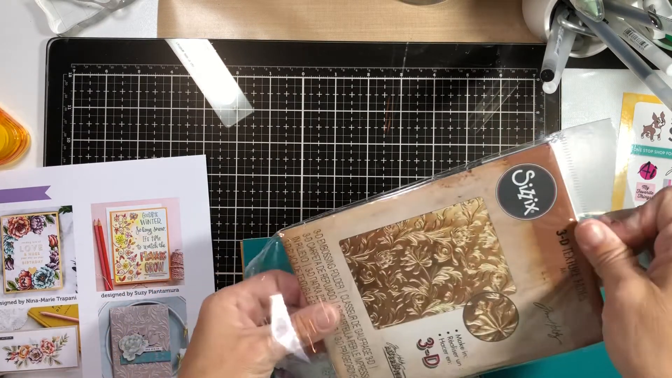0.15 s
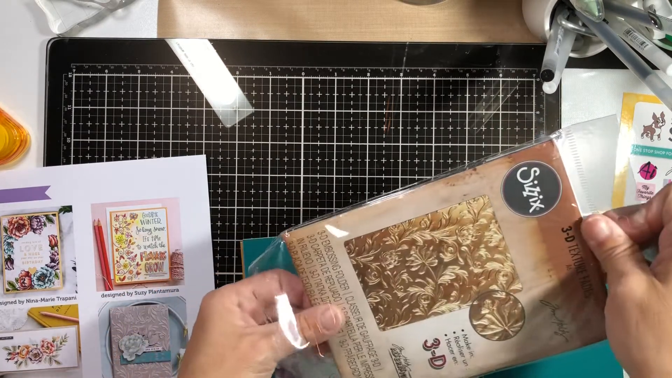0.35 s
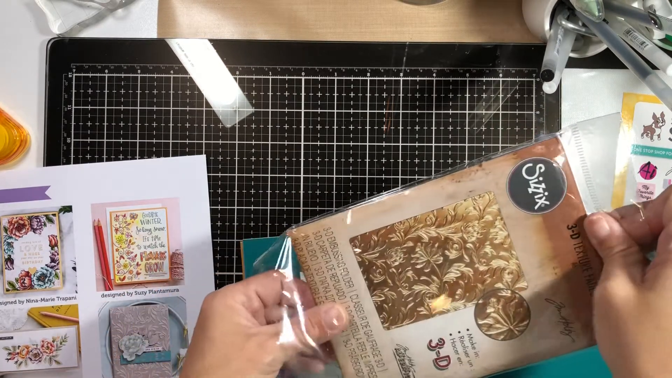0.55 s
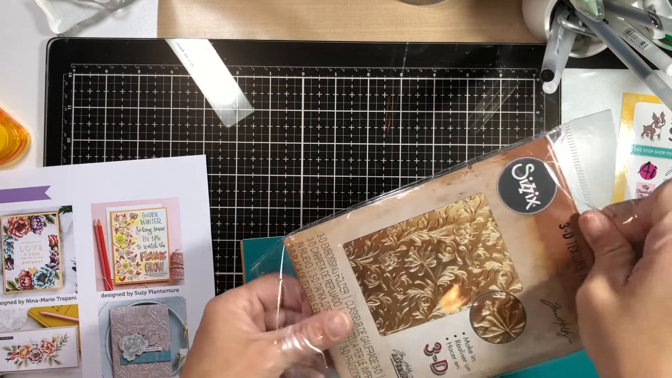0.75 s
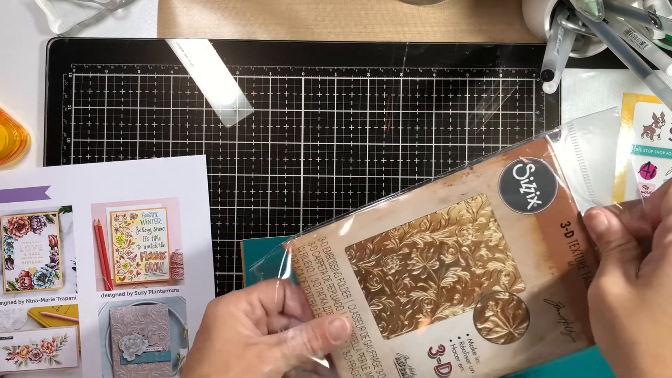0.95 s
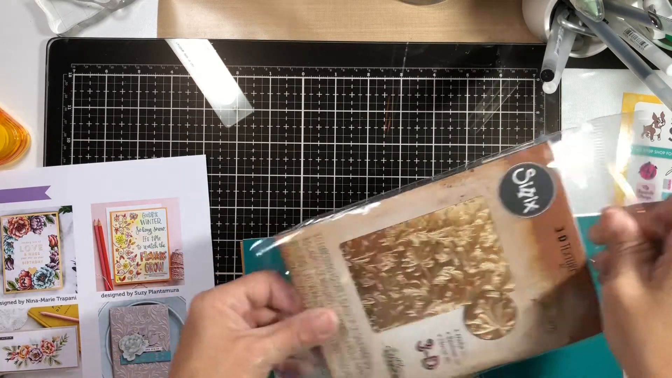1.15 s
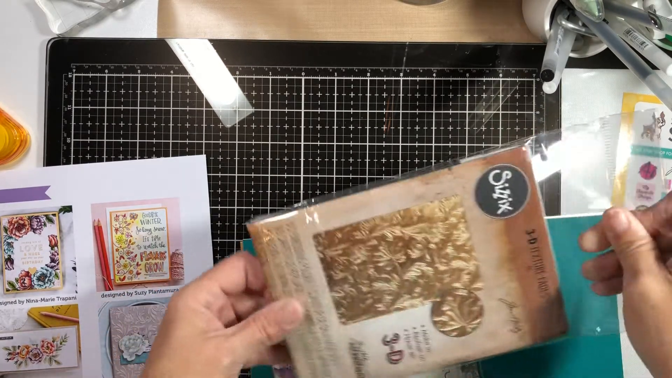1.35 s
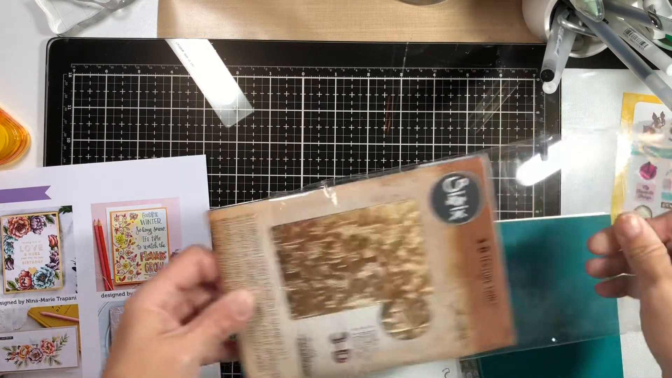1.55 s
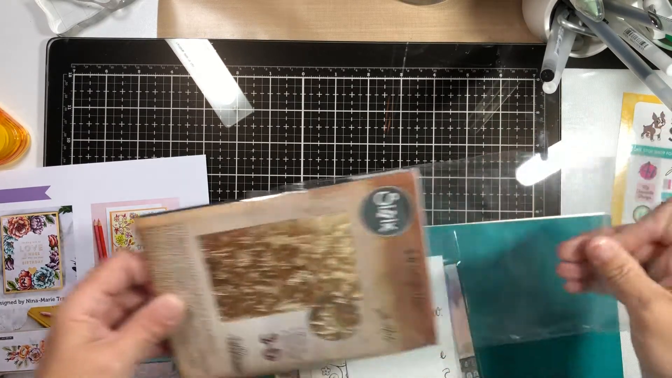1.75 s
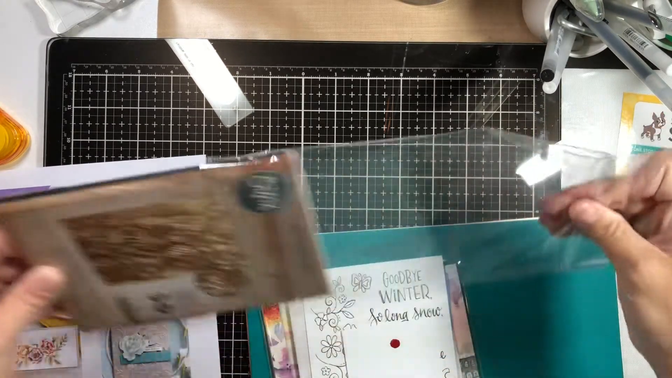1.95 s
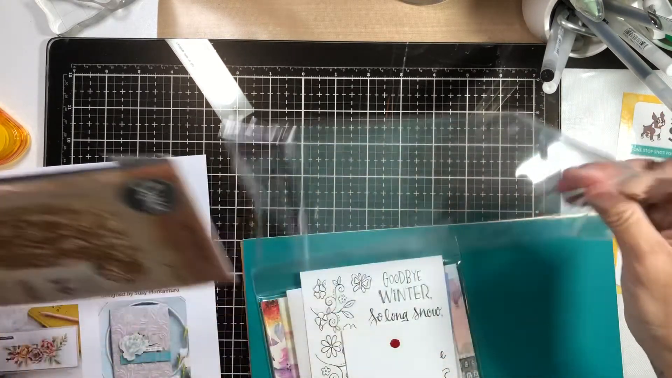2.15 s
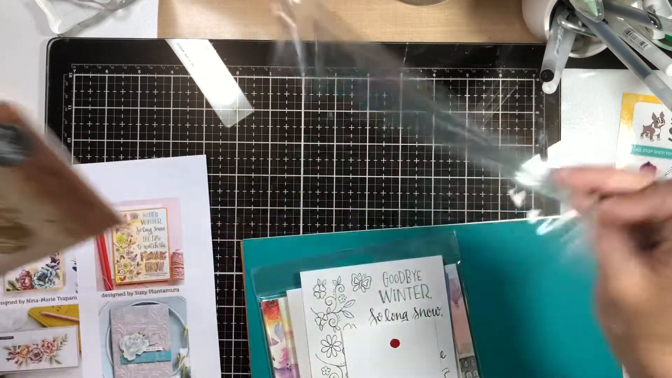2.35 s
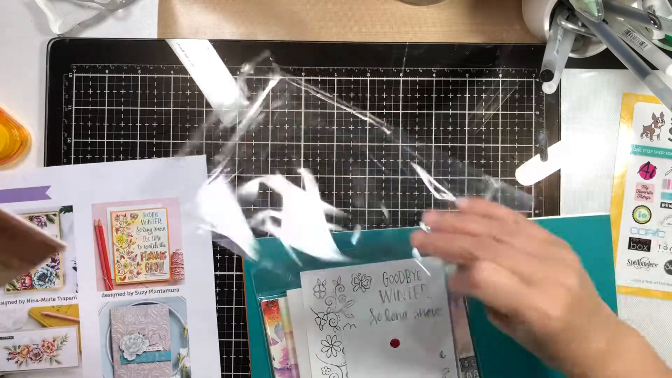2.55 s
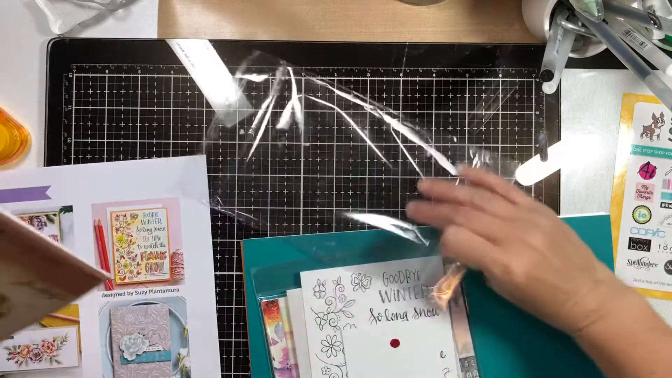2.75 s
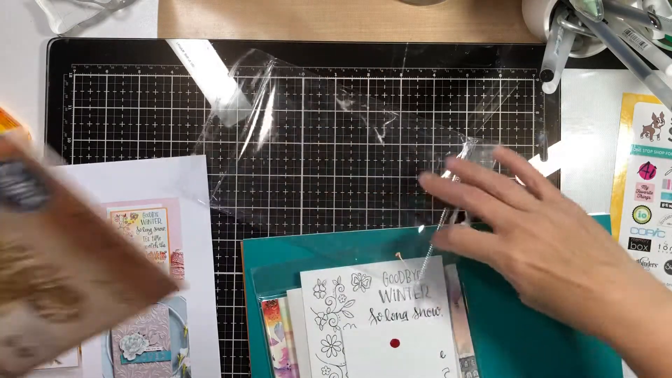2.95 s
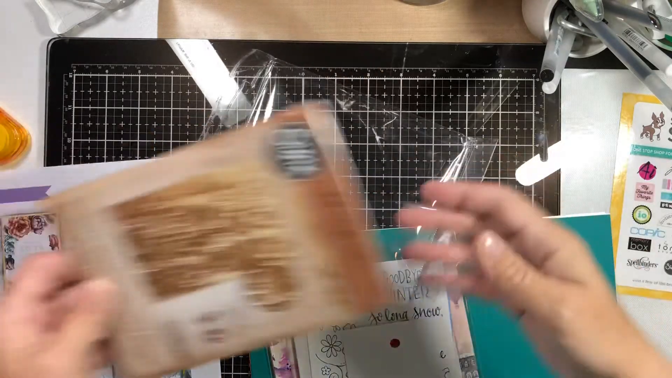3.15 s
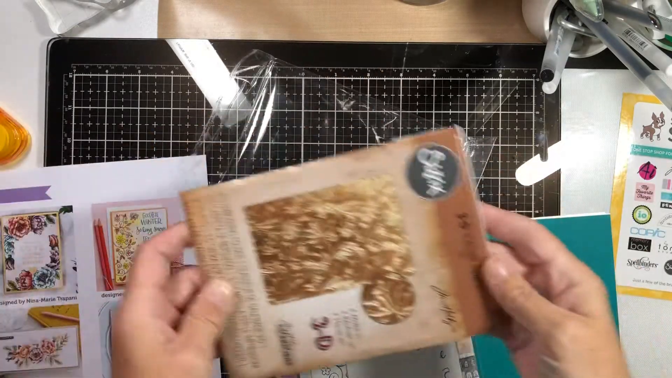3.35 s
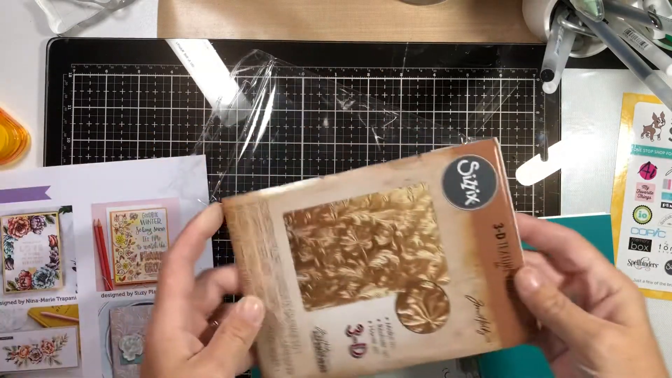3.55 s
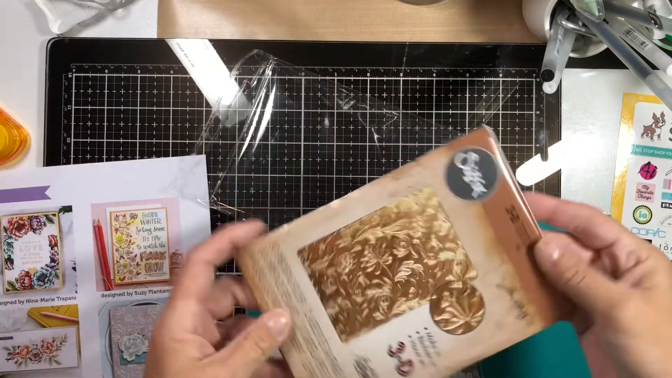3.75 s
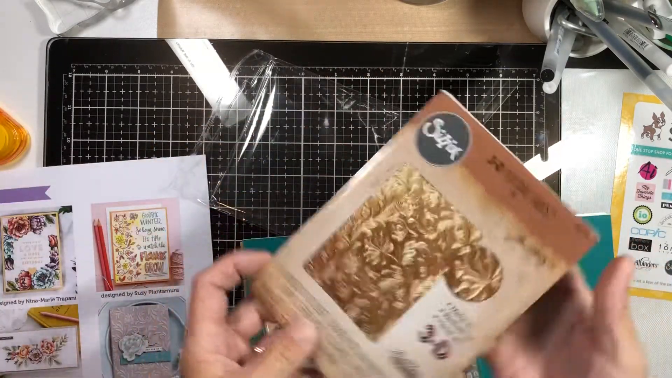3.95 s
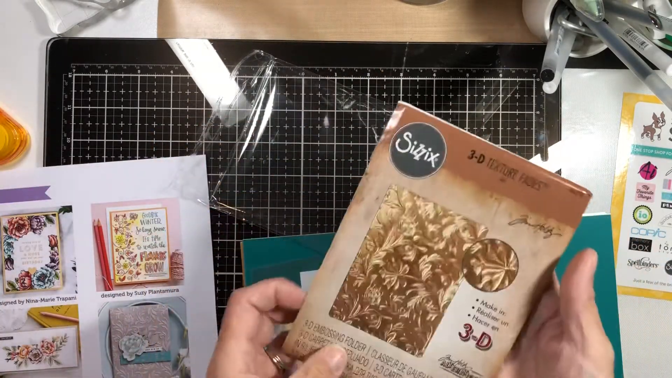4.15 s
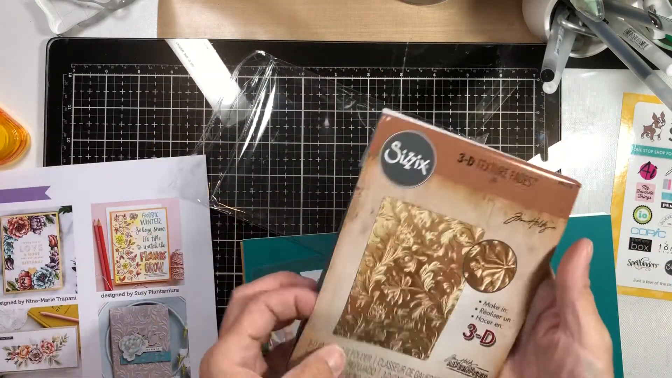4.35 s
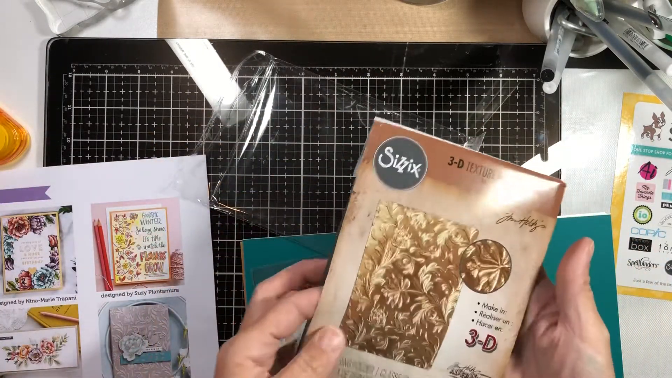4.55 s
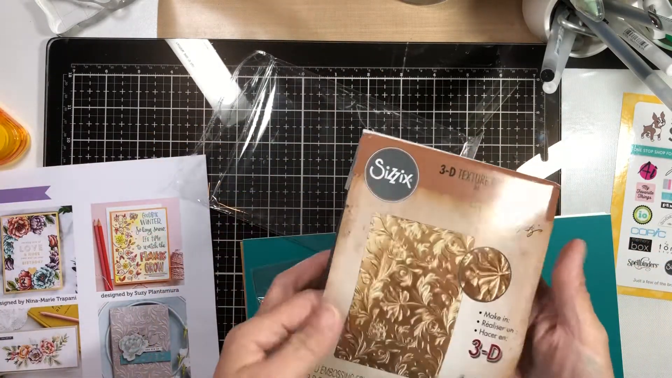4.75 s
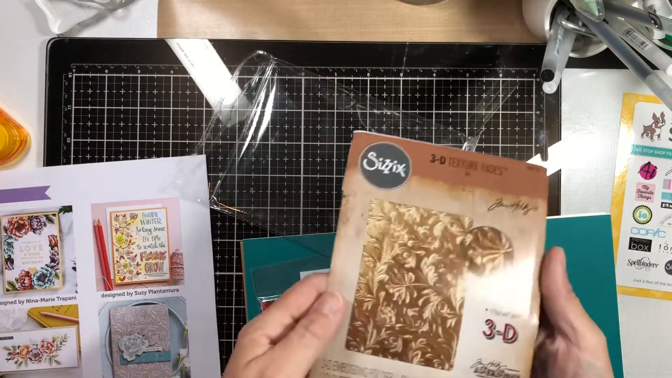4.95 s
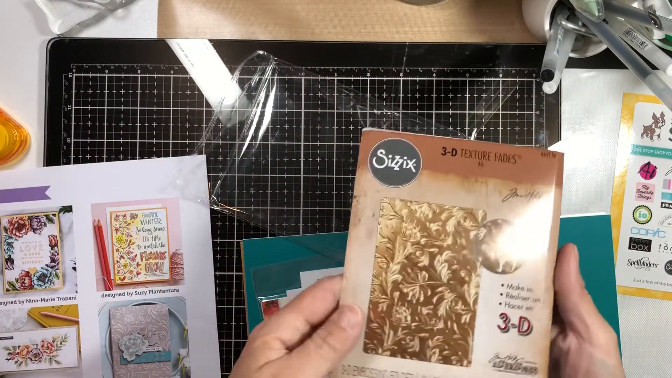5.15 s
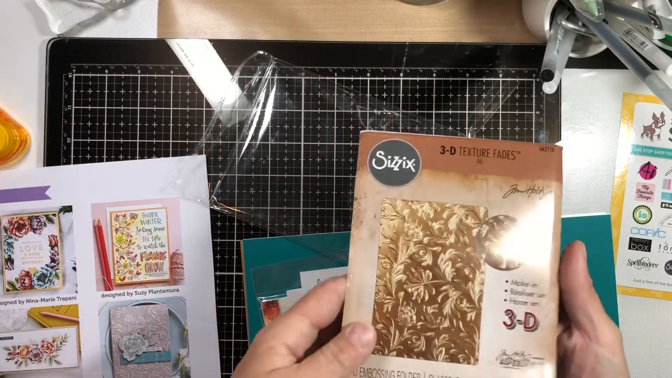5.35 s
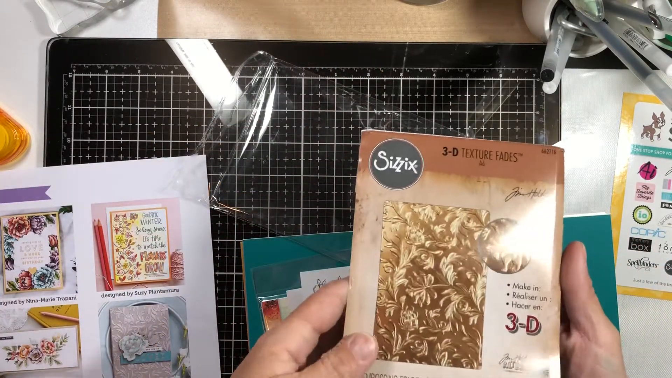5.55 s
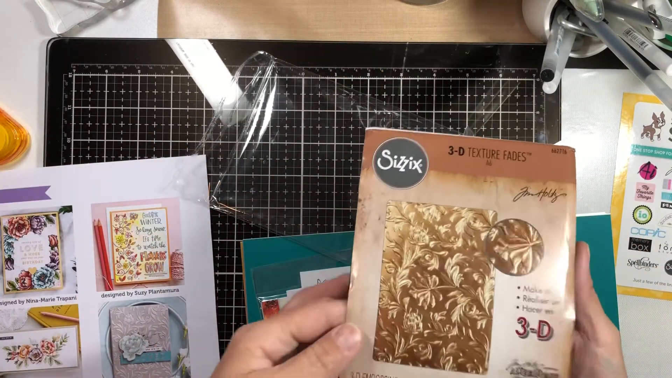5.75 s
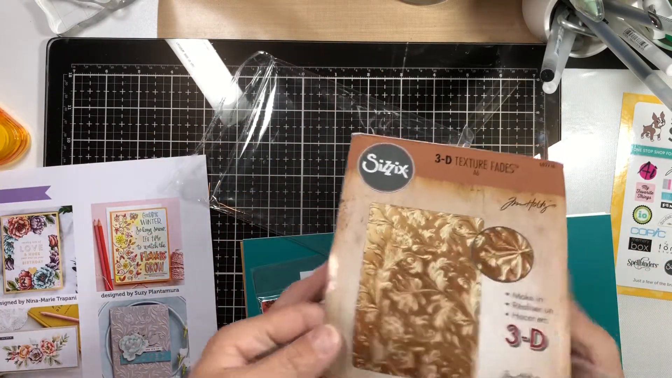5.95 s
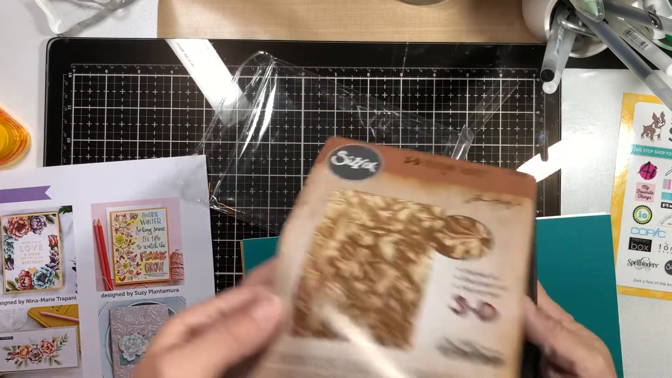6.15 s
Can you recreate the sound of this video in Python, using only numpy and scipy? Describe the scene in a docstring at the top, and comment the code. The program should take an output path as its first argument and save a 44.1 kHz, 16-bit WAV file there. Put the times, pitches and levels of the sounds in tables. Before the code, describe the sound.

Crisp plastic film crackles and swishes as a card pack slides from its sleeve, then soft finger rubs and taps over a fading low hum.

```python
"""Card pack out of a plastic sleeve

A card pack is worked out of a plastic sleeve above a craft table, close by. Creases of the film snap:
each is a dispersed click plus a ringing facet. Film hisses, then fingers rub the card: dense random slips
drive bands of sheet modes. Bumps ring the modes of the pack, and steady strokes make single resonances sing.
A small motor, a harmonic tone of sinking pitch, hums low in the room over a mains tone and shaped noise.
"""
import sys
import numpy as np
from scipy import signal
from scipy.fft import rfft, irfft
from scipy.io import wavfile
from scipy.ndimage import uniform_filter1d

SR = 44100
rng = np.random.default_rng(int(sys.argv[2]) if len(sys.argv) > 2 else 0)


def master_out(mix):
    """Clip the mix to full scale and print it as 16-bit PCM to the path in sys.argv[1]."""
    frames = np.transpose(np.atleast_2d(mix))
    ceiling = np.clip(frames, -1, 1)
    pcm = np.round(ceiling * 32767).astype(np.int16)
    wavfile.write(sys.argv[1], SR, pcm)


N = 272959
TIME_S = np.arange(N) / SR
MS_SAMPLES = SR // 1000
TOP_HZ = 16300  # upper limit of the treble
CARD_SHAKE_DB = -23  # shake of the card, relative to the tabled crack level
KNOCK_TICK_DB = -3  # tick of the contact, relative to the ring of the pack
MOTOR_START_HZ, MOTOR_SAG_HZ_PER_S = 82.4, .55
ROOM_AIR_DB, DRAUGHT_DB = -67, -73.5

# Clearest buckling creases, levels before the trims in snaps():
# (time [s], crack level [dB], crack centre [Hz], facet pitch [Hz], facet level [dB])
CREASE_SNAPS = [(.0474, -30, 4050, 6830, -22), (0.0763, -31, 14800, 3900, -32.5),
                (.091, -40, 4040, 13400, -51), (0.123, -34.5, 8200, 7250, -51),
                (0.1556, -35, 9800, 2670, -47), (.17, -35, 8100, 2200, -46), (.2167, -54, 3400, 10900, -22),
                (.2228, -32, 8700, 4330, -37), (.2392, -33, 4700, 14410, -19.5),
                (0.2531, -24, 6500, 2850, -28), (0.2565, -22.5, 12300, 2700, -43),
                (0.309, -21.5, 14800, 2120, -36), (.3183, -15, 10200, 7540, -25),
                (0.3936, -42.5, 2490, 2790, -48), (.4799, -54, 3100, 2270, -42),
                (0.5115, -25.5, 4430, 15060, -19), (0.6114, -36, 3400, 1960, -35),
                (.63, -37, 6000, 5800, -28.5), (.6396, -30, 11100, 2690, -42),
                (.6538, -27, 8800, 1570, -42), (0.666, -25, 4900, 13730, -31),
                (0.7219, -30, 3700, 7740, -28.5), (0.7485, -31.5, 3800, 11490, -30),
                (.762, -39, 11200, 2650, -24.5), (0.7744, -35, 3800, 14500, -19),
                (0.8114, -27, 3020, 930, -33.5), (.853, -31.5, 7700, 2800, -33.5),
                (0.897, -31, 5200, 1220, -43), (.9087, -23, 14900, 3140, -34),
                (.9442, -37, 7300, 2560, -58), (1.0998, -50, 794, 2740, -47),
                (1.1494, -52, 895, 2010, -36.5), (1.232, -29, 6300, 1850, -36),
                (1.2396, -27, 4100, 755, -28.5), (1.2711, -24.5, 6600, 2280, -30),
                (1.29, -23.5, 7300, 2230, -27), (1.302, -27, 2880, 12000, -27.5),
                (1.328, -35, 2900, 9190, -37), (1.3817, -36, 3800, 12300, -35),
                (1.419, -25.5, 8300, 6280, -26.5), (1.4226, -25, 3750, 1780, -28),
                (1.473, -30, 4100, 14520, -22.5), (1.481, -24, 7200, 2330, -30.5),
                (1.5787, -24.5, 6940, 930, -37.5), (1.7402, -41, 4700, 11100, -28.5),
                (1.7634, -34, 2700, 13000, -34), (1.8358, -31.5, 4300, 1310, -39),
                (1.8527, -32, 3220, 12760, -35), (2.0727, -22, 9800, 5950, -25.5),
                (2.108, -33, 4000, 2000, -52), (2.2067, -37, 8400, 4900, -34.5),
                (2.3204, -35.5, 8600, 5060, -39), (2.3712, -37, 3500, 8550, -39.5),
                (2.4907, -34, 5000, 1480, -48), (2.506, -35.5, 1790, 5060, -25),
                (2.706, -35.5, 5500, 1420, -43), (2.7367, -23, 4600, 5040, -48),
                (2.7672, -40, 4800, 5230, -38), (2.773, -44, 4200, 9100, -47),
                (2.7873, -34.5, 3900, 14150, -32), (2.8286, -35.5, 900, 2180, -37),
                (2.8389, -39, 1800, 5300, -45), (2.896, -26.5, 2700, 13720, -30.5),
                (2.9065, -30, 5100, 1490, -41), (2.9393, -30.5, 7950, 2550, -34.5),
                (3.049, -47.5, 4400, 4050, -49.5), (3.3056, -56, 14100, 4440, -40),
                (3.3208, -59, 1700, 5350, -34.5), (3.4462, -33, 4470, 1900, -44),
                (3.7533, -38.5, 4700, 3040, -46), (3.8056, -34.5, 5940, 2000, -46),
                (4.0306, -56, 3120, 4770, -27.5), (4.381, -37, 9000, 6700, -34),
                (4.466, -52, 5000, 5470, -27), (5.0853, -37.5, 2710, 4400, -41),
                (5.2104, -35.5, 2040, 3800, -31), (5.8467, -30.5, 3540, 1370, -37),
                (5.8935, -55, 2000, 1460, -39)]
# Pulls of the film over pack and table, levels before the trims in rub():
# (start [s], end [s], level [dB], swell start to end [dB], hiss over level [dB], body over level [dB],
#  spread of slip sizes [dB])
FILM_STROKES = [(0, .012, -53.5, -4.5, 13, -6, 5.5), (.05, .1, -60.5, 3, 0, -3.5, 7),
                (.11, .19, -73, 6, -2, 6, 8), (.2, .34, -54, -3.5, 2.5, -6, 6),
                (.35, .45, -68.5, 2, 7, 2, 8), (.53, .6, -60, 5, 3, -3.5, 8),
                (.605, .675, -52, 10, 6.5, -5.5, 5), (.68, .865, -59, 5, 4, -1, 7.5),
                (.885, 1.0, -56, -12, 6, -3.5, 5), (1.01, 1.18, -74.5, -2, -7, 6.5, 8),
                (1.197, 1.31, -50.5, -6, 7, -3, 3.5), (1.32, 1.46, -56, -0.5, 7, -2, 5),
                (1.495, 1.77, -49, -7, 9.5, -10.5, 0), (1.78, 1.88, -59, -1.5, 6, -1, -0.5),
                (1.91, 1.99, -48.5, 1.5, 14.5, -11, 0), (2.02, 2.105, -50.5, 2.5, 10, -10.5, 0.5),
                (2.12, 2.17, -63, -2, 6, -1, 1), (2.185, 2.21, -57, -5.5, 16, -5.5, 3),
                (2.23, 2.37, -65.5, 4, -3, -3, 10.5), (2.42, 2.49, -70.5, 2, 6, 2, 6),
                (2.51, 2.65, -65.5, 2, -6.5, -2.5, 6.5), (2.75, 2.81, -56.5, -3, -10, -2, 8.5),
                (2.835, 2.94, -51, 3.5, -5, -10, 5)]
# Fingers sliding over the card, levels before the trims in rub():
# (start [s], end [s], level [dB], swell start to end [dB], hiss over level [dB], body over level [dB],
#  spread of slip sizes [dB])
CARD_STROKES = [(3.315, 3.35, -68.5, -3, 6, 5, 5), (3.37, 3.55, -71, 2.5, 6.5, -10, 3.4),
                (3.655, 3.73, -69.5, -5.5, 7, -9, 3), (3.75, 3.87, -63, 6.5, 7.5, -15, 2.1),
                (3.93, 4.0, -59, 0.5, 7, -16, 4.3), (4.02, 4.3, -60.5, -6.5, 5.5, -8.5, 2.4),
                (4.37, 4.7, -52.5, -6, -5, -14, 2.5), (4.77, 5.06, -55, 2, -7.5, -9, 1.5),
                (5.085, 5.115, -48, 3, -5, -14, 3), (5.16, 5.54, -61.5, -12.5, -5.5, -9, 2.7),
                (5.66, 5.8, -58, -6, -4.5, -8.5, 2.3), (5.84, 5.92, -61, -8, -3.5, 1.5, 2.4),
                (5.95, 6.05, -65.5, 7, -1, -7, 3), (6.08, 6.19, -52, -3, -5, -6.5, 2.1)]
# Colour of the sliding film, relative: (frequency [Hz], density [dB per Hz])
FILM_COLOUR = [(120, -43), (200, -13.5), (519, -8.5), (659, -13.5), (986, -8.5), (1120, -16), (1770, -0.5),
               (2910, 1.5), (4270, 1), (4600, 5.5), (6760, -1.5), (7830, -3), (9930, -2), (14900, -5),
               (16000, -12.5)]
# Colour of the rubbed card, relative: (frequency [Hz], density [dB per Hz])
CARD_COLOUR = [(120, -46), (200, -28), (334, -27.5), (432, -15.5), (569, -13.5), (933, -42), (1300, -11),
               (2130, -2.5), (2910, -8), (5730, -10), (6760, -15), (7540, -13), (9060, -21.5),
               (11900, -18.5), (16000, -23)]
# Strokes that set a patch of sheet singing, level before the fades:
# (start [s], end [s], centre [Hz], width [Hz], level [dB])
SINGING_STROKES = [(1.454, 1.762, 7960, 900, -49.5), (1.873, 1.987, 4080, 900, -48),
                   (3.492, 3.55, 5640, 1000, -66), (3.632, 3.88, 3180, 398, -69),
                   (3.979, 4.215, 5000, 2000, -58), (4.299, 4.405, 3120, 450, -53),
                   (3.928, 4.18, 2150, 500, -68), (4.399, 4.776, 2260, 600, -54.5),
                   (4.496, 4.75, 7140, 500, -67.5), (4.515, 4.756, 12000, 600, -67),
                   (6.064, 6.19, 1290, 500, -57.5)]
# Bumps of the pack against fingers and sleeve: (time [s], level [dB], pitch of contact tick [Hz])
PACK_KNOCKS = [(.2545, -36.5, 2800), (.6663, -41.5, 1600), (.701, -35.5, 2700), (.7217, -41, 1690),
               (.853, -35, 2500), (.9442, -46.5, 2560), (1.1494, -42, 1400), (1.2711, -37.5, 1000),
               (1.3021, -33, 1920), (1.3822, -42, 900), (1.4226, -36.5, 1770), (1.481, -36, 1000),
               (1.5786, -46, 1000), (1.7634, -40.5, 990), (1.8527, -37, 2320), (1.985, -41.5, 604),
               (2.9063, -42.5, 1000), (3.3203, -52, 900), (3.97, -47, 4400), (4.414, -37.5, 1750),
               (4.7575, -44.5, 2080), (4.7987, -38.5, 2070), (5.2104, -39, 1410), (5.2234, -42.5, 1970),
               (5.382, -45, 2120), (5.9229, -34, 1350), (6.107, -41.5, 328)]
# Modes of the card pack: (frequency [Hz], width [Hz], gain [dB])
CARD_MODES = [(286, 140, -4.5), (422, 38, 4), (520.5, 44, 3), (686, 103, -2), (993, 86, -5),
              (1584, 120, -3.5)]
# Motor fundamental, rms before the waver: (time [s], level [dB])
MOTOR_LEVEL = [(0, -47), (.4, -43), (.7, -46.5), (1.2, -49), (1.7, -53.5), (2.2, -55), (2.7, -58.5),
               (3.4, -55), (6.19, -62)]
# Colour of the still room, relative: (frequency [Hz], density [dB per Hz])
ROOM_COLOUR = [(25, -31), (45, -14), (76, -18), (130, -13), (162, -11), (322, -14.5), (974, -20),
               (1460, -23), (2140, -23), (2560, -27.5), (4880, -29), (16000, -35.5)]


def amp(db):
    """Decibels to gain."""
    return 10 ** (np.asarray(db) / 20)


def unit(x):
    """Scale to rms 1."""
    return x / np.sqrt(np.mean(x ** 2))


def unit_energy(x):
    """Scale a response so that it passes white noise unchanged in level."""
    return x / np.sqrt(np.sum(x ** 2))


def resonate(x, hz, q):
    """One damped resonance with gain 1 at its centre, applied in the frequency domain."""
    ratio = np.fft.rfftfreq(len(x), 1 / SR) / hz
    response = 1j * ratio / (1j * ratio + max(q, .1) * (1 - ratio ** 2))
    return irfft(rfft(x) * response, len(x))


def cut(x, hz, kind, order=2):
    """Low-, high- or band-pass."""
    return signal.sosfilt(signal.butter(order, hz, kind, fs=SR, output="sos"), x)


def colour(x, points):
    """Shape a sound with a spectrum interpolated over log frequency."""
    hz, db = np.transpose(points)
    f = np.maximum(np.fft.rfftfreq(len(x), 1 / SR), 1)
    return irfft(rfft(x) * amp(np.interp(np.log(f), np.log(hz), db)), len(x))


def walk(rate_hz):
    """Random drift of rms 1, with rate_hz knots a second joined by straight lines."""
    knots = rng.standard_normal(int(N / SR * rate_hz) + 2)
    return unit(np.interp(TIME_S * rate_hz, np.arange(len(knots)), knots))


def tail(t60_s, size):
    """A dense decaying ring of energy 1."""
    decay = np.exp(-np.log(1000) * TIME_S[:size] / t60_s)
    return unit_energy(rng.standard_normal(size) * decay)


def snaps(creases, ring_t60_s=.028, ring_db=-3.5, facet_q=4.8, knock_t60_s=.04, knock_ring_db=-6,
          crack_trim_db=-1.0, facet_trim_db=-1.0, size=4096):
    """Each crease flips at once and rings a facet; bending waves scatter in the sheet and shake the card."""
    out = np.zeros(N + size)
    flip = signal.unit_impulse(size, MS_SAMPLES)
    for time_s, crack_db, crack_hz, facet_hz, facet_db in creases:
        ring = np.roll(tail(ring_t60_s, size), MS_SAMPLES)
        scattered = cut(flip + amp(ring_db) * ring, TOP_HZ, "lowpass", order=10)
        # a small patch of film radiates little bass
        patch = cut(resonate(scattered, crack_hz, 1), 630, "highpass")
        crack = unit_energy(disperse(patch, lag_s=.0022))
        facet = unit_energy(resonate(scattered, facet_hz, facet_q))
        rattle = np.roll(tail(knock_t60_s, size), MS_SAMPLES)
        shake = unit_energy(card_body(flip + amp(knock_ring_db) * rattle))
        snap = amp(crack_db + crack_trim_db) * crack
        snap += amp(facet_db + facet_trim_db) * facet
        snap += amp(crack_db + CARD_SHAKE_DB) * shake
        start = int(time_s * SR) - MS_SAMPLES
        # level is that of the energy gathered into one millisecond
        out[start:start + size] += np.sqrt(MS_SAMPLES) * snap
    return out[:N]


def disperse(x, lag_s):
    """Bending waves run slower the lower they are; lag_s is their delay at 1 kHz."""
    khz = np.fft.rfftfreq(len(x), 1 / SR) / 1000
    return irfft(rfft(x) * np.exp(-4000j * np.pi * lag_s * np.sqrt(khz)), len(x))


def crackle(level_db, start_s, end_s, over_db, scatter_db, centre_hz, count):
    """Small creases give way at random times, their strength following the level of the rubbing."""
    times_s = start_s + (end_s - start_s) * rng.random(count)
    size, crack, facet = rng.standard_normal((count, 3)).T
    db = np.interp(times_s, TIME_S, level_db) + over_db + scatter_db * np.clip(size, -2, 2)
    crack_hz = np.minimum(centre_hz * np.exp(.5 * crack), TOP_HZ)
    facet_hz = np.minimum(centre_hz * np.exp(.5 * facet), TOP_HZ)
    return list(zip(times_s, db, crack_hz, facet_hz, db))


def strokes(table, attack_s, release_s, slowing_db):
    """Strokes set in, swell or fade and die away, hiss falling as the hand slows; gives level and mix."""
    power, hiss, body, spread = np.full((4, N), 1e-14)
    for start_s, end_s, db, swell_db, hiss_db, body_db, spread_db in table:
        along = np.clip((TIME_S - start_s) / (end_s - start_s), 0, 1) - .5
        before = np.maximum(start_s - TIME_S, 0) / attack_s
        after = np.maximum(TIME_S - end_s, 0) / release_s
        stroke = (amp(db + swell_db * along) * np.exp(-before - after)) ** 2
        power = power + stroke
        hiss = hiss + stroke * (hiss_db - slowing_db * along)
        body = body + stroke * body_db
        spread = spread + stroke * spread_db
    # overlapping strokes are averaged by power
    return 10 * np.log10(power), hiss / power, body / power, spread / power


def rub(motion, spectrum, rate_hz, mid_db, hiss_db, body_db, card_db):
    """Slips sound through the sheet; speed brings out the hiss, pressure the body and the pack's modes."""
    level_db, speed_db, pressure_db, spread_db = motion
    ticks = slips(rate_hz, spread_db)
    pressed_db = level_db + pressure_db
    pack = amp(pressed_db + card_db) * unit(card_body(ticks * rng.standard_normal(N)))
    skin = sheet(ticks, spectrum, pressed_db + body_db, level_db + mid_db, level_db + speed_db + hiss_db)
    return skin + pack


def slips(rate_hz, spread_db, flutter_db=2.1, largest=6):
    """Countless tiny stick-slip releases of random size, evened to a steady mean level that flutters."""
    sizes = amp(spread_db * np.minimum(rng.exponential(size=N), largest))
    ticks = (rng.random(N) < rate_hz / SR) * sizes
    mean_level = np.sqrt(uniform_filter1d(ticks ** 2, size=1300) + 1e-9)
    return ticks / mean_level * amp(flutter_db * walk(90))


def sheet(ticks, spectrum, body_db, mid_db, hiss_db, tint_db=2.0, tint_rate_hz=8, count=21):
    """Each slip drives the sheet's ranges of modes differently, and their strengths drift as it bends."""
    hz, db = np.transpose(spectrum)
    edges_hz = np.geomspace(220, TOP_HZ, count + 1)
    centres_hz = np.sqrt(edges_hz[1:] * edges_hz[:-1])
    density_db = np.interp(np.log(centres_hz), np.log(hz), db)
    power = amp(density_db) ** 2 * np.diff(edges_hz)
    # bring the summed power of body, middle and hiss to the wanted levels
    zone = np.digitize(centres_hz, [1250, 4500])
    zone_db = 10 * np.log10(np.bincount(zone, power))
    lifts_db = np.array([body_db, mid_db, hiss_db]) - zone_db[:, None]
    out = 0
    for k, centre_hz in enumerate(centres_hz):
        # zones blend into one another without a step
        blend = np.array([np.interp(np.log(centre_hz), np.log([700, 2400, 8000]), row) for row in np.eye(3)])
        band = unit(cut(ticks * rng.standard_normal(N), edges_hz[k:k + 2], "bandpass"))
        gain = amp(blend @ lifts_db + tint_db * walk(tint_rate_hz))
        out = out + band * np.sqrt(power[k]) * gain
    return out


def table_echo(x, lag_s=.000891, sway=.23, share=.27):
    """The table reflects the moving sheet a moment later, so a comb of resonances slides in the rubbing."""
    moving_lag_s = lag_s * np.exp(sway * walk(3))
    echo = np.interp(TIME_S - moving_lag_s, TIME_S, x)
    return (x + share * echo) / np.sqrt(1 + share ** 2)


def knocks(rattle_t60_s=.04, rattle_db=-6, tick_q=4.0, size=4096):
    """A bump gives a dull tick and rings the modes of the pack."""
    out = np.zeros(N + size)
    for time_s, db, tick_hz in PACK_KNOCKS:
        push = signal.unit_impulse(size) + amp(rattle_db) * tail(rattle_t60_s, size)
        ring = unit_energy(card_body(push))
        tick = unit_energy(resonate(push, tick_hz, tick_q))
        start = int(time_s * SR)
        # level of the ring is that of its energy gathered into one millisecond
        out[start:start + size] += np.sqrt(MS_SAMPLES) * amp(db) * (ring + amp(KNOCK_TICK_DB) * tick)
    return out[:N]


def card_body(push):
    """The stiff pack answers a push with its few damped modes, alternating in sign."""
    out = 0
    for k, (hz, width_hz, db) in enumerate(CARD_MODES):
        out = out + (-1) ** k * amp(db) * resonate(push, hz, hz / width_hz)
    return out


def swishes():
    """A steady stroke feeds one resonance of the sheet, which swells and fades with it."""
    out = np.zeros(N + SR)
    for start_s, end_s, hz, width_hz, db in SINGING_STROKES:
        first = int(start_s * SR)
        size = max(int((end_s - start_s) * SR), 64)
        narrow = resonate(rng.standard_normal(size), hz, hz / width_hz)
        tone = unit(resonate(narrow, hz, 1.3))
        out[first:first + size] += amp(db) * signal.windows.tukey(size, .5) * tone
    return out[:N]


def room(x, t60_s=.098, wet_db=-16, late_t60_s=.79, late_db=-24):
    """Quick reflections from the table and nearby things, then a faint, duller tail."""
    early = np.roll(tail(t60_s, size=16384), SR // 400)
    late = cut(tail(late_t60_s, size=16384), 4880, "lowpass")
    return x + signal.fftconvolve(x, amp(wet_db) * early + amp(late_db) * late)[:N]


def hum(second_db=-20, third_db=-17, third_fade_s=.2, mains_hz=120, mains_db=-71, rumble_db=-66, waver_db=.8):
    """A slowing motor with octave and soon fading third harmonic, a mains tone, and a narrow low rumble
    close to the motor's pitch, which makes the hum beat unevenly."""
    level_db = np.interp(TIME_S, *np.transpose(MOTOR_LEVEL))
    phase = 2 * np.pi * np.cumsum(MOTOR_START_HZ - MOTOR_SAG_HZ_PER_S * TIME_S) / SR
    second = amp(second_db + 3 * walk(9)) * np.sin(2 * phase)
    third = amp(third_db) * np.exp(-TIME_S / third_fade_s) * np.sin(3 * phase)
    motor = amp(level_db + waver_db * walk(4.8)) * (np.sin(phase) + second + third)
    mains = amp(mains_db) * np.sin(2 * np.pi * mains_hz * TIME_S)
    rumble = unit(resonate(resonate(rng.standard_normal(N), 86.6, 10), 85, 1.1))
    return np.sqrt(2) * (motor + mains) + amp(rumble_db) * rumble  # sqrt(2): sine levels are rms


def room_air():
    """The soft even hiss of the still room: noise of a fixed colour."""
    return amp(ROOM_AIR_DB) * unit(colour(rng.standard_normal(N), ROOM_COLOUR))


def draught():
    """A faint low draught: steady noise in one band."""
    return amp(DRAUGHT_DB) * unit(cut(rng.standard_normal(N), [60, 280], "bandpass", order=3))


def scene():
    """Handling noise in a small room, over the hum and a soft even hiss."""
    pulls = strokes(FILM_STROKES, attack_s=.013, release_s=.02, slowing_db=3.5)
    slides = strokes(CARD_STROKES, attack_s=.017, release_s=.021, slowing_db=3)
    film = rub(pulls, FILM_COLOUR, rate_hz=6000, mid_db=-1.0, hiss_db=-3.5, body_db=-1.5, card_db=-4.5)
    card = rub(slides, CARD_COLOUR, rate_hz=4000, mid_db=-1.0, hiss_db=-.5, body_db=-3.5, card_db=-1.5)
    opening = crackle(pulls[0], 0, 1.46, over_db=8.5, scatter_db=3.5, centre_hz=5440, count=40)
    fingering = crackle(slides[0], 3.3, 6.15, over_db=6, scatter_db=-.5, centre_hz=3000, count=45)
    creases = list(CREASE_SNAPS) + opening + fingering
    handling = snaps(creases) + table_echo(film + card) + knocks() + swishes()
    mix = room(handling) + hum() + room_air() + draught()
    return mix[None]


def record(dry):
    """The recorder cuts the top of the treble with a steep low-pass."""
    return signal.sosfilt(signal.ellip(8, .2, 70, TOP_HZ, fs=SR, output="sos"), dry)


dry = scene()
out = record(dry)
master_out(out)
```